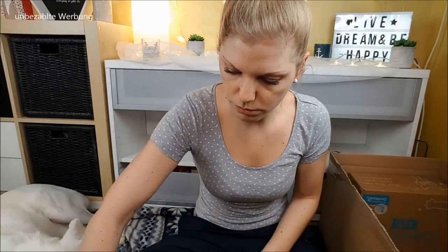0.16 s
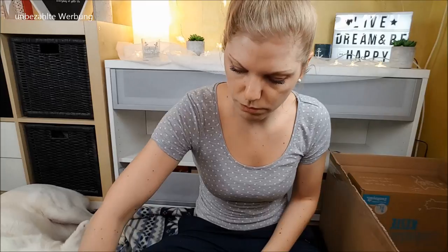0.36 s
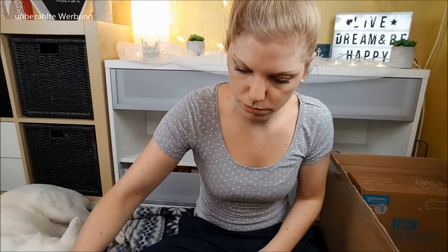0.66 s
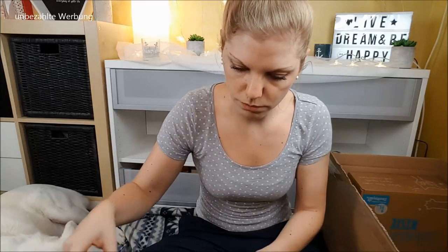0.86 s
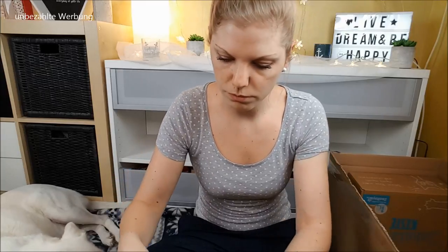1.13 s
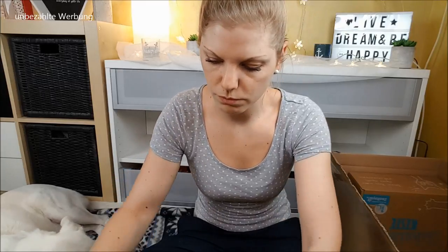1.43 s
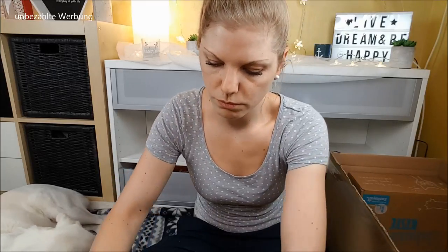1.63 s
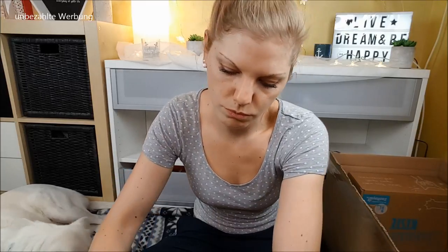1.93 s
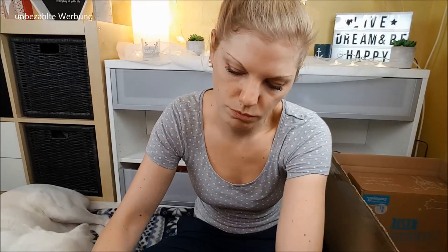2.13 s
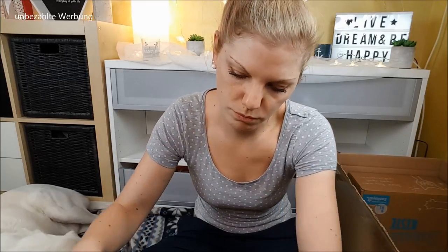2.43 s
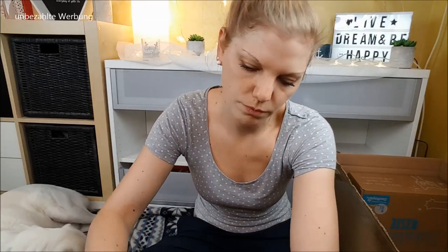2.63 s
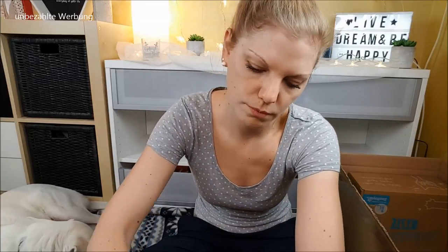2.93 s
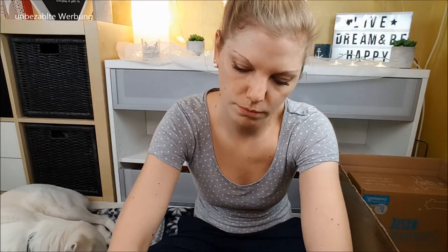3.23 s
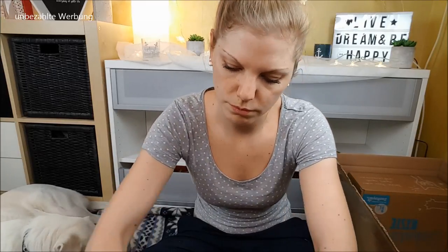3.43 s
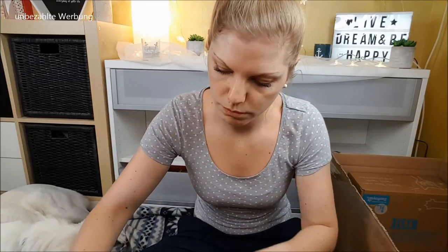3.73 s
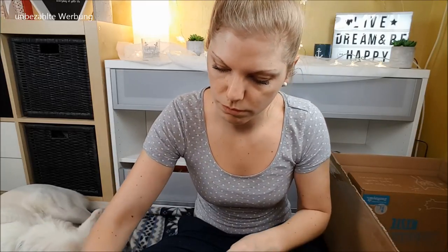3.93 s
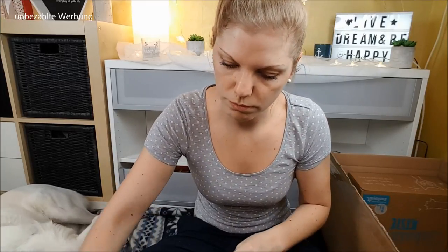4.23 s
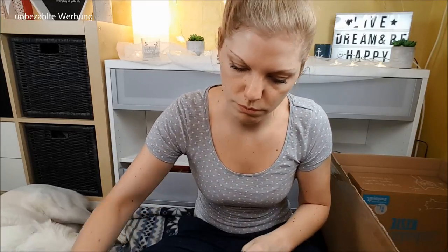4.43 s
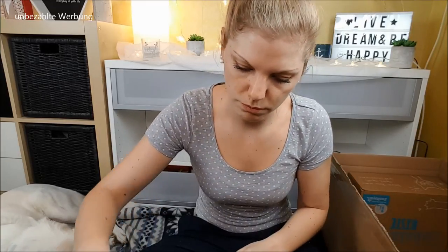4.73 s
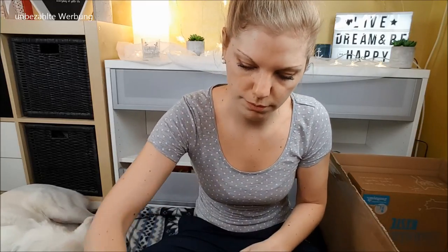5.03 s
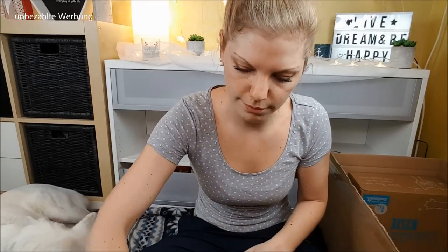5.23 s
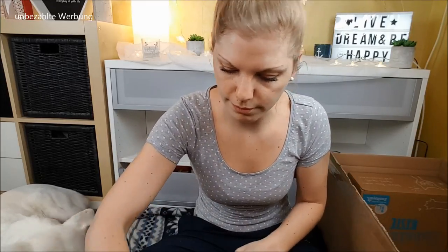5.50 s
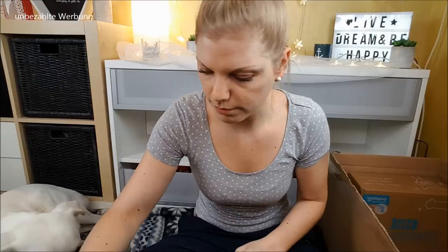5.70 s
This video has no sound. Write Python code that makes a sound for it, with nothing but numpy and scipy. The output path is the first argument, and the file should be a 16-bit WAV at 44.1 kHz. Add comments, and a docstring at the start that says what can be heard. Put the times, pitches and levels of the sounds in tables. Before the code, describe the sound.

A dog gnaws a hard, dry chew on a wooden floor in a small furnished room, heard from a step or two away in stereo, near the centre with a short room echo. Light tooth clicks and scrapes come at the start and around 0.3 to 0.6 s, with faint touches after. Thin, bright snaps tick at about 1.1 to 1.3 s. From about 1.9 to 2.5 s biting grows firmer and the chew knocks dully on the boards. A sharp, hollow crack with gritty splintering hits at 2.8 s, and crunches and dense woody knocks pile up between 3.1 and 3.5 s. Then only sparse, soft contacts remain, near 3.8 to 4.7 s. A last bout runs from 5.2 to 5.6 s, with strong knocks, scraping and a crack with a brittle, high snap. Low, quiet room tone and a faint, steady microphone hiss continue throughout.

```python
"""A dog gnaws a hard chew on a wooden floor in a small furnished room, a step or two from a camera.
Light bites and scrapes come first, then thin snaps at about 1.1 s; near 2 s the chew also knocks on the
boards. Bites crack at 2.8 s, dense knocks follow to 3.5 s, then sparse contacts, and a last bout from 5.2 s.
Impulses and noise excite damped modes of chew and floor; shaped noise forms snaps and splintering.
Decaying noise tails answer as the room; steady coloured noise underneath is room tone and microphone hiss."""
import sys
import numpy as np
from scipy import signal
from scipy.fft import rfft, irfft, next_fast_len
from scipy.io import wavfile
from scipy.ndimage import map_coordinates

SR = 44100
rng = np.random.default_rng(int(sys.argv[2]) if len(sys.argv) > 2 else 0)


def voltage_ratio(decibels):
    """Convert decibels (scalar or array-like) to amplitude ratios, 20 dB per decade."""
    exponent = np.asarray(decibels, float) / 20
    return 10 ** exponent


def dump(signal):
    """Clip the signal to [-1, 1] and save it as 16-bit WAV at the path in sys.argv[1]."""
    limited = np.clip(np.atleast_2d(signal).T, -1, 1)
    pcm = np.round(limited * 32767).astype(np.int16)
    wavfile.write(sys.argv[1], SR, pcm)


N = 258408  # samples

# teeth crack into the chew:
# [t/s, relative level of its hollow/dB, strongest ringing f/Hz, hard edge re hollow/dB, boards re hollow/dB]
BITES = [(.035, -40, 813, -16, -19.5), (.05, -45, 845, -15, -9.5), (.302, -51, 833, -4.5, -1.5),
         (0.343, -52.5, 950, -23, -0.5), (.412, -50, 880, -19, -11), (.421, -43.5, 824, -13, -3.5),
         (0.612, -57, 880, 4, -4), (.951, -49, 775, -8, -2), (1.363, -52, 910, -14, -6),
         (1.403, -55, 910, -1.5, -24), (1.959, -40, 770, 7.5, 4), (1.987, -45.5, 810, 4.5, 5.5),
         (2.204, -35.5, 851, -5.5, -4.5), (2.22, -39.5, 1030, 2.5, 6), (2.515, -50, 890, -27, -12),
         (2.799, -25, 1010, -8.5, -13.5), (2.83, -47.5, 825, 13, -18), (2.857, -47.5, 1180, 9.5, -1.5),
         (2.984, -42.5, 1310, 4, -5), (3.101, -47.5, 1310, -15, -1), (3.275, -37, 805, -2, -1),
         (3.311, -30, 820, -3.5, -2), (3.322, -31, 1250, -30, 0.5), (3.337, -45.5, 1180, -5, 6),
         (3.812, -48, 886, -21, -23), (3.836, -53, 840, -23.5, -12), (4.74, -51, 890, -18, -8),
         (5.176, -55.5, 786, 7.5, 2), (5.444, -42.5, 860, -2, -13), (5.539, -29, 820, -6.5, 1.5)]
# the chew hits the floor:
# [t/s, relative level of boards/dB, strongest ringing f/Hz, thud re boards/dB, chew re boards/dB]
KNOCKS = [(1.969, -42, 194, -6.5, -12), (2.051, -43, 287, -0.5, 0.5), (2.097, -40.5, 310, -3.5, -1),
          (2.234, -36, 293, 2, -10), (2.394, -59, 585, -15, 5), (3.188, -41, 330, -8.5, -8),
          (3.287, -34, 283, 0.5, -4), (3.359, -40, 310, -8, -16), (3.417, -42, 390, 0, -11),
          (3.47, -31, 248, 4.5, -4), (3.487, -35, 295, -18, -2.5), (3.494, -27, 285, -11, -18),
          (3.519, -42, 242, -9, -6.5), (3.889, -54.5, 490, 2.5, -7), (4.139, -49, 172, -27, -27),
          (4.294, -56, 340, 2, -5.5), (4.335, -63.5, 400, 9, 1), (4.592, -58, 566, -23, -9.5),
          (5.199, -32.5, 340, -2, -6), (5.216, -35.5, 312, -5, -5), (5.242, -43.5, 353, -23, -17),
          (5.362, -24, 246, -25, -13), (5.385, -44, 222, -1, -5), (5.42, -50, 300, 14, -7),
          (5.489, -40.5, 218, -6, -6), (5.551, -32.5, 225, -16, 0.5), (5.574, -35, 206, -10, -26)]
# teeth drag over the chew: [t of the hardest pull/s, relative level of scrape/dB, boards re scrape/dB,
# grit re scrape/dB, fade of scrape/(dB/s)]
STROKES = [(.002, -53.5, 1, -2.5, 497), (.335, -67.5, 7, -5.5, 62), (.43, -61, 1, -12, 105),
           (.49, -67.5, 4, -0.5, 402), (.6, -65.5, -4, -4.5, 150), (.72, -75, 4, -14, 35),
           (.8, -73, -7, -18, 50), (.955, -68.5, 9, -6, 200), (1.816, -70, -9, -0.5, 200),
           (1.908, -69.5, -16, 1.5, 400), (2.018, -54.5, 4, -8.5, 54), (2.13, -67, 3, 7, 288),
           (2.224, -55.5, -1, 1.5, 245), (2.33, -63, -5, -2.5, 84), (2.398, -68, 3.5, 0, 276),
           (2.807, -45, -0.5, 2.5, 54.5), (2.986, -52.5, 2.5, -5, 136), (3.132, -52, 5.5, -3.5, 106),
           (3.294, -56.5, 16, 1.5, 145), (3.348, -45, -10, -11.5, 272), (3.43, -56, 11, -9, 61),
           (3.487, -44, 9, -8, 258), (3.58, -75, 12, -2, 202), (4.34, -82.5, 16, -12, 76),
           (5.06, -85, 19.5, -12, 102), (5.2, -53, 9, -2.5, 267), (5.383, -54.5, 6.5, -2.5, 83),
           (5.44, -66, 18, 1.5, 91), (5.56, -63.5, 19.5, 6.5, 105)]
# snaps and squeaks of fibre: [t/s, relative level/dB, centre f/Hz, width/Hz, t60 of the noise burst/s]
SNAPS = [(0.019, -62, 9400, 1500, 0.25), (.614, -56.5, 5170, 1790, 0.098),
         (1.131, -40.5, 8800, 7800, 0.0034), (1.144, -54.5, 8800, 8000, 0.025),
         (1.259, -43, 6700, 5260, 0.005), (1.783, -65, 9200, 300, 0.071), (1.815, -62.5, 9600, 1800, .05),
         (1.903, -53, 4220, 2500, 0.0092), (1.989, -46.5, 4340, 3000, 0.0063),
         (5.54, -46.5, 10100, 3020, 0.049), (5.551, -51, 10400, 4000, 0.026)]
# resonances of chew, floor boards and joists: [f/Hz, width/Hz, relative level/dB]
CHEW = [(793, 134, 1), (1115, 227, -2), (1340, 195, 2.5), (1614, 510, -1.5), (2240, 430, -2),
        (2523, 510, -1.5), (3400, 2500, -9.5), (4320, 1840, -12)]
BOARDS = [(149, 34, -5), (196, 74, -2.5), (237.8, 43, 2), (299, 15, -0.5), (329, 22.6, 1.5),
          (390, 52.4, -1.5), (506, 52, -3), (581, 26, -2)]
JOISTS = [(62, 28, -11), (85.3, 17, 0), (115, 32, 0.5)]
HOLLOW, EDGE = CHEW[:3], CHEW[3:]
# spectrum of splintering: [f/Hz, relative level per Hz/dB]
GRIT = [(2060, -11), (3500, -6.5), (4790, -10.5), (6510, -13), (6980, -14), (9720, -16), (12300, -14),
        (15700, -26)]
# left-right likeness of the nearby sound: [f/Hz, correlation]
NEAR_ALIKE = [(100, 0.96), (300, 0.96), (640, 0.93), (1400, 0.26), (3000, 0.59), (8000, 0.082)]
# decay time of the room: [f/Hz, t60/s]
ROOM_T60 = [(60, 0.39), (300, 0.21), (2000, 0.31), (12000, 0.31)]
# gain of the echo: [f/Hz, level/dB]
ROOM_LEVEL = [(60, -5), (150, -6.5), (300, -4.5), (1000, -2), (4000, -5.5), (12000, -2.5)]
# left-right likeness of the echo: [f/Hz, correlation]
ROOM_ALIKE = [(60, 0.92), (300, 0.94), (640, 0.28), (1400, 0), (3000, 0)]
# balance of dog and echo: [f/Hz, left minus right level/dB]
LEAN = [(250, -1), (600, -1), (2000, -1), (5000, -3), (12000, 1.5)]
# spectrum of room tone: [f/Hz, relative level per Hz/dB]
TONE = [(15, -38), (25, 5.5), (48, -3), (87, -7), (200, -10), (409, -15.5), (477, -15.5), (612, -16),
        (787, -18.5), (2500, -25.5), (3250, -59), (5500, -120)]
# left-right likeness of room tone: [f/Hz, correlation]
TONE_ALIKE = [(60, 0.33), (300, 0.33), (640, 0.11), (1400, 0.14), (3000, 0)]
# spectrum of microphone hiss: [f/Hz, relative level per Hz/dB]
HISS = [(1470, -47), (2500, -4), (3050, -3.5), (4730, -8), (9800, -12.5), (14500, -6.5), (15700, -13)]

BITE_BOARDS_HZ, BITE_THUD_DB = 397, -8.5  # one typical board pitch for all bites; thud re boards
KNOCK_EDGE_DB = -12  # hard edge re hollow; a knock rings the whole hollow
FIRM_DB, SOFTEN = -48, 0.57  # below FIRM_DB a contact loses SOFTEN dB of blow per dB
RATTLE_T60_S, RATTLE_SWELL_S = 0.073, 0.0023
SWELL_DB_PER_S = 340  # how fast the jaw tightens
BOARDS_FADE, GRIT_FADE = 1.48, 1.8  # times the fade of the scrape
TONE_DB, HISS_DB = -66.5, -75.0  # rms ahead of drift and bass cut


def unit(x):
    """Normalization: scaled to rms 1."""
    return x / np.sqrt(np.mean(x ** 2) + 1e-20)


def along(points, hz):
    """Interpolation of (f, value) points on a logarithmic frequency axis."""
    f, value = np.transpose(points)
    return np.interp(np.log(hz + 1), np.log(f + 1), value)


def filtered(x, response):
    """Linear filtering: the spectrum of x times a complex response of frequency."""
    size = next_fast_len(N + SR // 2)
    hz = np.fft.rfftfreq(size, 1 / SR)
    return irfft(rfft(x, size) * response(hz), size)[..., :N]


def modes(table):
    """Modal superposition: causal second-order resonances of alternating sign, energy 1."""
    def response(f):
        total = 0
        for k, (centre, width, db) in enumerate(table):
            damping = 1j * f * width
            total = total + (-1) ** k * voltage_ratio(db) * damping / (centre * centre - f * f + damping)
        return unit(np.abs(total)) * np.exp(1j * np.angle(total))
    return response


def ringing(table, t, centre_hz=None, focus_db=0, neighbour=-1):
    """Damped free vibration, energy 1; with a centre, the modes near it are struck hardest."""
    hz, width, db = np.transpose(table)[:, :, None]
    if centre_hz:
        db = db - focus_db * np.log2(hz / centre_hz) ** 2  # focus in dB per squared octave
    # neighbours move with (positive) or against (negative) each other
    sign = neighbour ** np.arange(len(table))[:, None]
    swing = sign * np.sin(2 * np.pi * hz * t)
    decay = np.exp(-np.pi * width * t)
    swell = 1 - np.exp(-3.5 * hz * t)
    ring = np.sum(voltage_ratio(db) * width * swing * decay * swell, axis=0)
    return ring / np.linalg.norm(ring)


def contacts(shape, spiky_db):
    """Stick-slip friction as noise of uneven grain: mostly faint touches, some strong slips."""
    noise = rng.standard_normal(shape)
    strength = np.minimum(rng.exponential(size=shape), 6)  # no slip grows without bound
    return unit(noise * voltage_ratio(spiky_db * strength))


def spread(pair, alike):
    """Interchannel correlation: two signals mixed as mid and side for a given left-right likeness."""
    def mid_side(hz):
        angle = np.arccos(np.clip(along(alike, hz), -1, 1)) / 2
        return np.array([np.cos(angle), np.sin(angle)])
    mid, side = filtered(pair, mid_side)
    return np.array([mid + side, mid - side])


def bites_and_knocks():
    """Impact excitation: a blow, then a dying rattle; the heavy floor feels mostly the blow."""
    out, t = np.zeros(N + SR), np.arange(SR // 10) / SR
    blows = []  # hollow dB and Hz, edge dB, boards dB and Hz, thud dB
    for s, db, hz, edge, boards in BITES:
        thud_db = db + boards + BITE_THUD_DB
        blows.append((s, db, hz, db + edge, db + boards, BITE_BOARDS_HZ, thud_db))
    for s, db, hz, thud, chew in KNOCKS:
        blows.append((s, db + chew, None, db + chew + KNOCK_EDGE_DB, db, hz, db + thud))
    rattles = contacts((len(blows), len(t)), spiky_db=5.5)
    rattles = rattles * voltage_ratio(-60 * t / RATTLE_T60_S) * (1 - np.exp(-t / RATTLE_SWELL_S))
    for event, rattle in zip(blows, rattles):
        s, hollow_db, hollow_hz, edge_db, boards_db, boards_hz, thud_db = event
        blow = (t == 0) * voltage_ratio(SOFTEN * min(max(hollow_db, boards_db) - FIRM_DB, 0))
        chew = voltage_ratio(hollow_db + 16.5) * ringing(HOLLOW, t, hollow_hz, focus_db=48.0)
        chew += voltage_ratio(edge_db + 17.5) * ringing(EDGE, t)
        floor = voltage_ratio(boards_db + 25.5) * ringing(BOARDS, t, boards_hz, focus_db=11.0, neighbour=1)
        floor += voltage_ratio(thud_db + 26.0) * ringing(JOISTS, t, neighbour=0.68)
        sound = signal.fftconvolve(blow + 0.11 * rattle, chew)
        sound += signal.fftconvolve(blow + 0.059 * rattle, floor)
        out[round(s * SR):][:len(sound)] -= sound  # the pressure drops first
    return out[:N]


def grit(f):
    """Spectral shaping: colour of splintering fibres, energy 1."""
    return unit(voltage_ratio(along(GRIT, f)))


def gnawing():
    """Friction excitation: swelling and fading strokes drive chew and boards, with grit on top."""
    s, scrape_db, boards_db, grit_db, fade = np.transpose(STROKES)[:, :, None]
    out, knots = np.zeros(N), np.arange(0, N, 32)
    late = knots / SR - s
    swell_db = SWELL_DB_PER_S * np.minimum(late, 0)
    fade_db = fade * np.maximum(late, 0)
    layers = ((0, 1, modes(CHEW), 5),
              (boards_db, BOARDS_FADE, modes(BOARDS), 5.4),
              (grit_db, GRIT_FADE, grit, 3.0))
    for re_db, faster, body, spiky_db in layers:
        strokes = voltage_ratio(scrape_db + re_db + swell_db - faster * fade_db)
        level = np.linalg.norm(strokes, axis=0)  # strokes add in power
        slips = np.interp(np.arange(N), knots, level) * contacts(N, spiky_db)
        out += filtered(slips, body)
    return out


def snaps():
    """Fracture of a fibre: a short decaying noise burst excites one high resonance."""
    out, t = np.zeros(N + SR), np.arange(SR // 12) / SR
    bursts = rng.standard_normal((len(SNAPS), len(t)))
    for (s, db, hz, width, t60), burst in zip(SNAPS, bursts):
        sound = signal.fftconvolve(burst * voltage_ratio(-60 * t / t60), ringing([(hz, width, 0)], t))
        out[round(s * SR):][:len(sound)] += voltage_ratio(db) * sound
    return out[:N]


def near(x):
    """Scattering by floor and furniture close by: the two ports hear the treble differently."""
    scattered, hop, t = np.zeros(N + SR), SR // 20, np.arange(SR // 50) / SR
    for start in range(0, N, hop):  # new paths every 50 ms
        paths = rng.standard_normal(len(t)) * voltage_ratio(-60 * t / 0.0089)  # t60 8.9 ms
        piece = signal.fftconvolve(x[start:start + hop], paths / np.linalg.norm(paths))
        scattered[start:][:len(piece)] += piece
    return spread(np.array([x, scattered[:N]]), NEAR_ALIKE)


def room(x):
    """Reverberation: a noise tail with frequency-dependent decay, redrawn every 0.25 s."""
    out, hop = np.zeros((2, N + SR)), SR // 4
    for start in range(0, N, hop):
        hz, t, z = signal.stft(rng.standard_normal((2, SR // 2)), SR, nperseg=256)
        decay = voltage_ratio(-60 * t / along(ROOM_T60, hz)[:, None])
        tail = signal.istft(z * decay, SR, nperseg=256)[1]
        wet = signal.fftconvolve(x[None, start:start + hop], tail / np.linalg.norm(tail[0]), axes=1)
        out[:, start + 80:][:, :wet.shape[1]] += wet  # delayed by 80 samples
    return spread(out[:, :N], ROOM_ALIKE)


def room_tone():
    """Stationary coloured noise: room air drifting a little in level, and steady microphone hiss."""
    air = filtered(rng.standard_normal((2, N)), lambda hz: voltage_ratio(along(TONE, hz)))
    hiss = filtered(rng.standard_normal((2, N)), lambda hz: voltage_ratio(along(HISS, hz)))
    drift = map_coordinates(rng.standard_normal(40), [np.arange(N) * 4 / SR])  # 4 random points per s
    air = voltage_ratio(TONE_DB + 0.29 * drift) * unit(spread(air, TONE_ALIKE))
    return air + voltage_ratio(HISS_DB) * unit(hiss)


def scene():
    """Superposition: the dog near the centre, its echo, and the background noise."""
    dog = bites_and_knocks() + snaps() + gnawing()
    echo = filtered(room(dog), lambda hz: voltage_ratio(along(ROOM_LEVEL, hz)))
    heard = voltage_ratio(-3) * near(dog) + echo
    leaning = filtered(heard, lambda hz: voltage_ratio(np.outer([.5, -.5], along(LEAN, hz))))
    return leaning + room_tone()


def roll_off(x):
    """The treble ends steeply here."""
    return signal.sosfilt(signal.butter(12, 15810, fs=SR, output="sos"), x)


def record(dry):
    """High-pass filtering: the camera cuts the lowest bass and adds a slight constant offset."""
    cut = filtered(dry, lambda hz: (1j * hz / (1j * hz + 42)) ** 4)  # four first-order stages at 42 Hz
    finished = cut - 0.0004  # of full scale
    return roll_off(finished)


dry = scene()
out = record(dry)
dump(out)
```